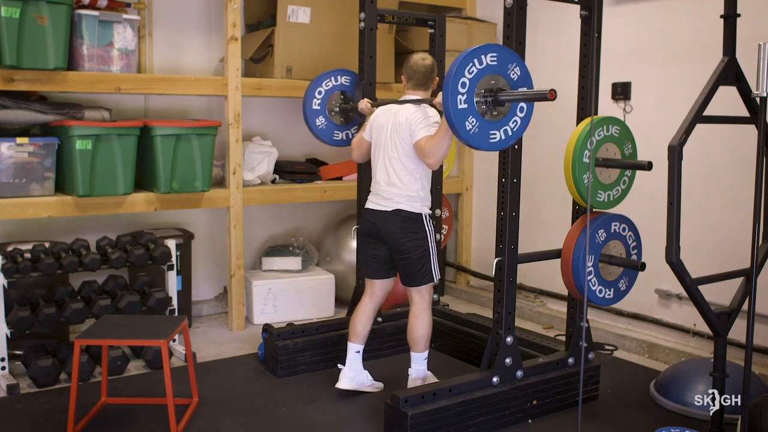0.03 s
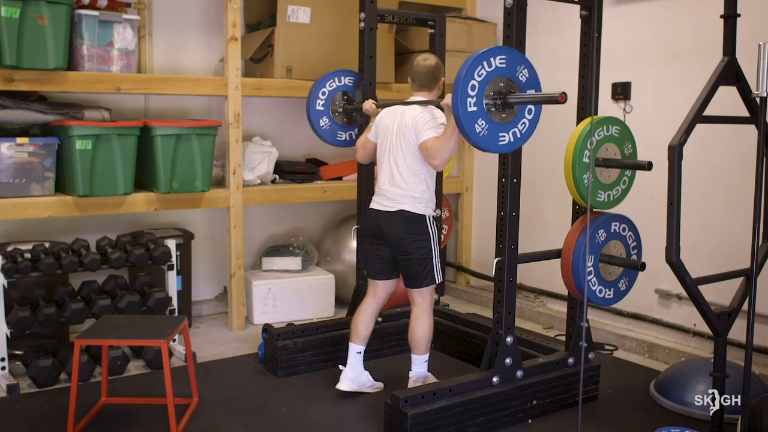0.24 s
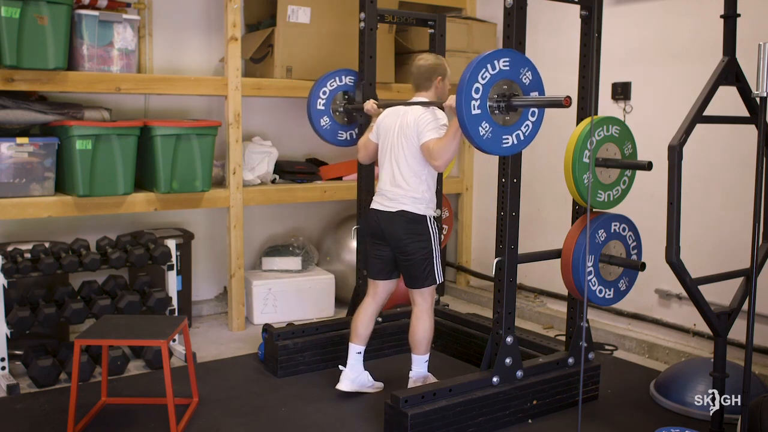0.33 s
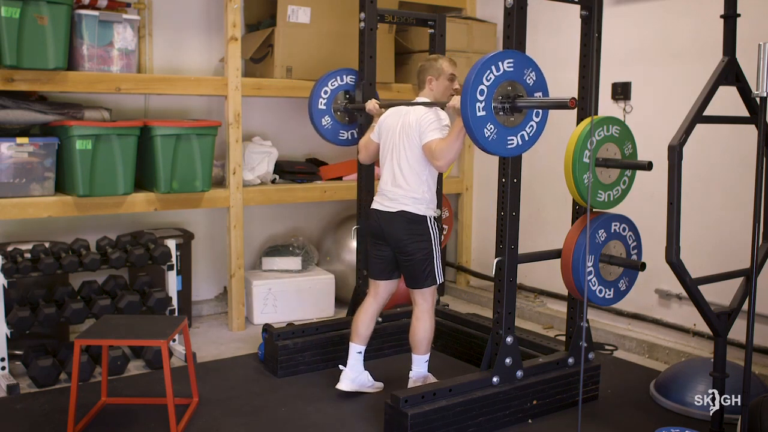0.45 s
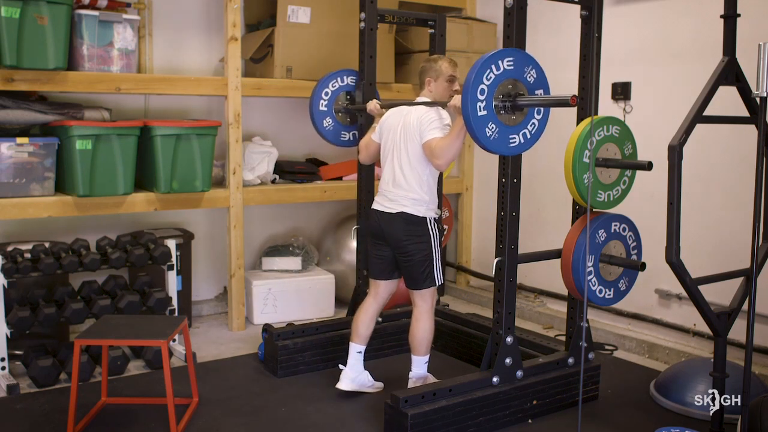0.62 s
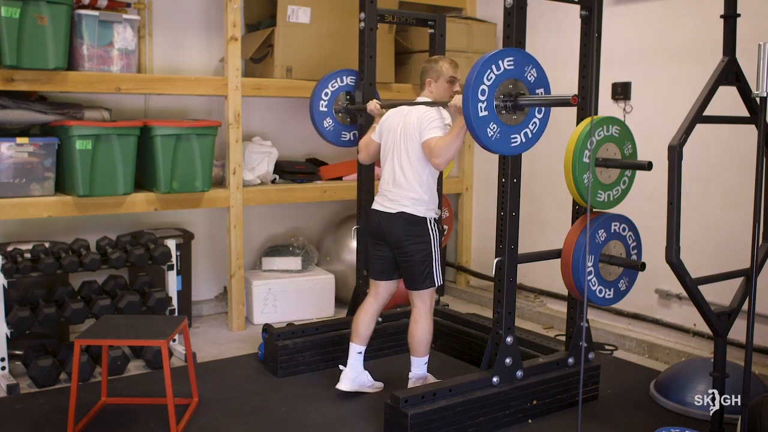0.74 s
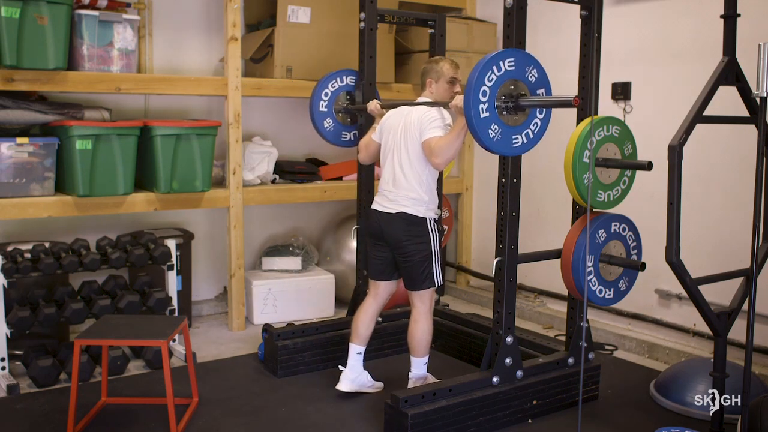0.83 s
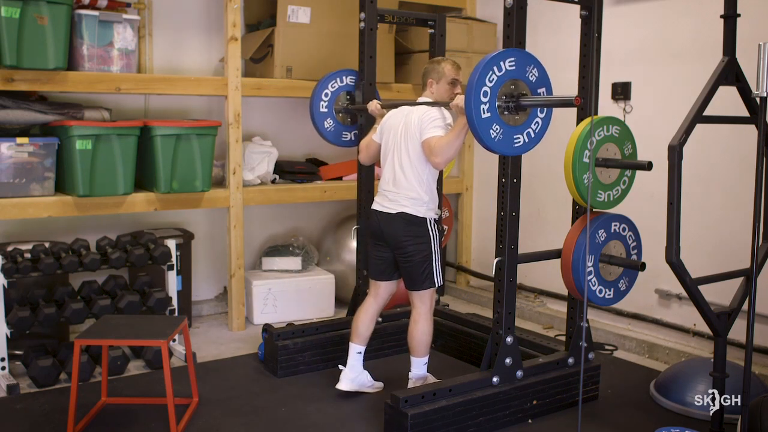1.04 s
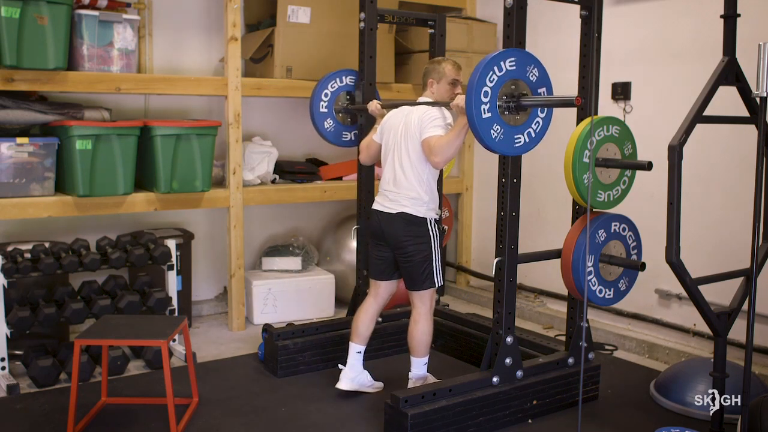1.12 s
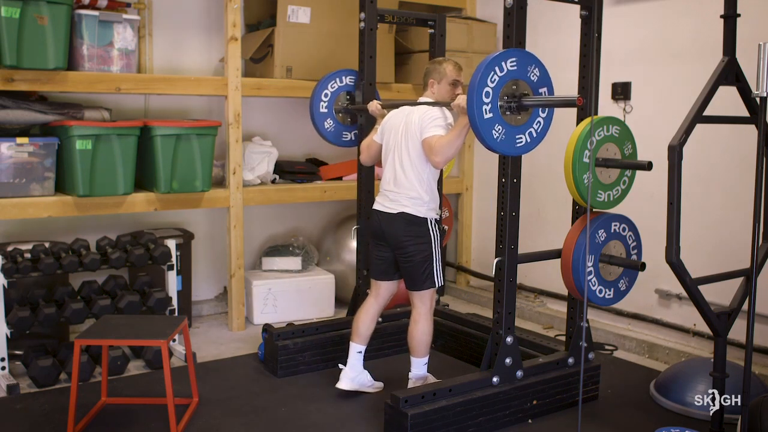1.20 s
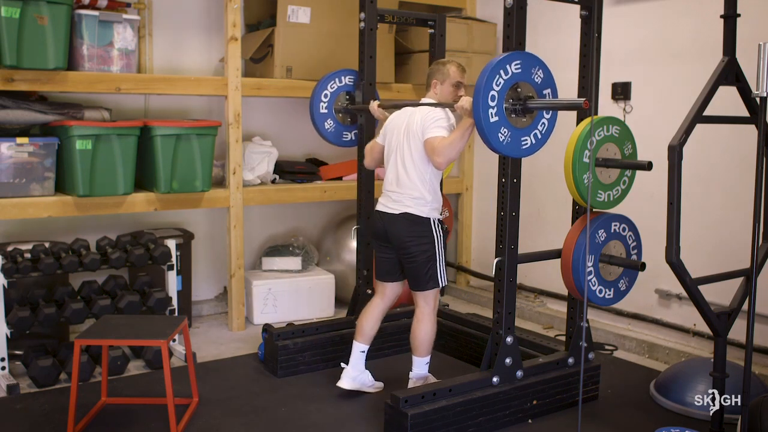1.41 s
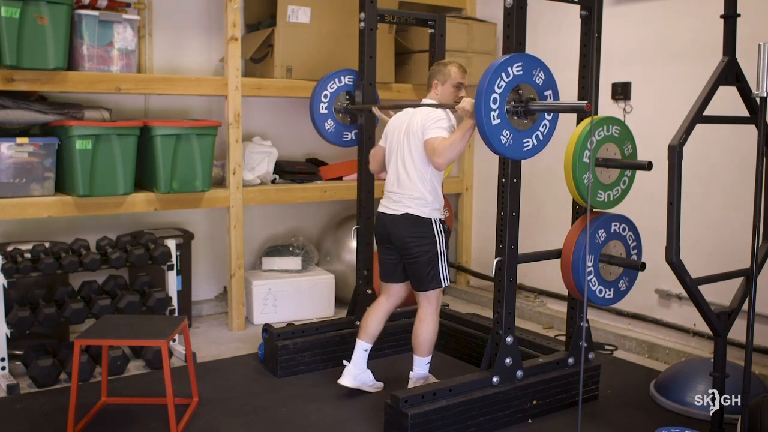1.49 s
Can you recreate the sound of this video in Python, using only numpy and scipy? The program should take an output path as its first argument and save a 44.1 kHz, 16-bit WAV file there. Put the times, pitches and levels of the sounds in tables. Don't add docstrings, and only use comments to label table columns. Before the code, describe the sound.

A loaded barbell is racked in a bare, echoing garage gym over faint hum and distant insects. At 0.2 s it scrapes with low floor thuds, then clanks onto steel hooks at 0.33 s. Knocks and sleeve clinks follow around 0.44-0.53 s, a harder landing at 0.67 s, rebounds near 0.75-0.9 s, and settling taps at 1.09-1.3 s. The frame rings; a shoe ticks stickily at 1.43 s.

```python
import sys
import numpy as np
from scipy import signal
from scipy.fft import rfft, irfft
from scipy.io import wavfile
from scipy.ndimage import uniform_filter1d

SR = 44100
rng = np.random.default_rng(int(sys.argv[2]) if len(sys.argv) > 2 else 0)


def wrap_up_sound(samples):
    columns = np.atleast_2d(samples).T
    tamed = np.clip(columns, -1, 1)
    steps = np.round(tamed * 32767).astype(np.int16)
    wavfile.write(sys.argv[1], SR, steps)


def voltage_ratio(level):
    return 10 ** (np.asarray(level, float) / 20)


N = 68355
TAIL = 36000
DIRECT_T60 = 0.011

# (frequency [Hz], level [dB])
FRAME_BODY = [(120, -61), (200, -21), (387, -13), (735, -0.5), (806, -1.5), (968, -5.5), (1480, -3.5),
              (3020, -2), (16000, -54)]
# (frequency [Hz], level [dB], t60 [s])
FRAME_MODES = [(1174, -7.5, 0.64), (1280, -12, 0.17), (1344, -5, 0.82), (1527, -6, 1.34), (1650, -15, .4),
               (1764, -2, 0.38), (1790, -7, 0.76), (2068, -2.5, 0.47), (2810, -4.5, 0.69),
               (2876, -7.5, 0.81), (5200, -18, .25)]


def unit(x):
    return x / np.sqrt(np.mean(x ** 2) + 1e-20)


def along(points, hz):
    f, v = np.transpose(points)
    return np.interp(np.log(hz + 1), np.log(f + 1), v)


def add(track, s, x):
    place = track[round(s * SR):][:len(x)]
    place += x[:len(place)]


def noise(gain):
    return unit(irfft(rfft(rng.standard_normal(N)) * gain(np.fft.rfftfreq(N, 1 / SR)), N))


def drift(count):
    changes_hz = 60
    knots = rng.standard_normal((2, count, 100))
    at = np.arange(TAIL) / SR * changes_hz
    return np.array([np.interp(at, np.arange(100), k) for k in knots[0] + 1j * knots[1]])


def clatter(body, peaks, tilt_db):
    # (frequency [Hz], t60 [s])
    room = [(100, 1), (400, 0.34), (1500, 0.51), (3500, 0.3), (7000, 0.23), (14000, 0.23)]
    direct_db, patchy_db = 0.5, 0.37
    late_db, late_longer = -21, 4.26
    hz, t, z = signal.stft(rng.standard_normal(TAIL), SR, nperseg=256)
    room_t60 = along(room, hz)[:, None]
    patches = uniform_filter1d(rng.standard_normal(z.shape), size=3, axis=0)
    patches = uniform_filter1d(patches, size=6, axis=1)
    fall = voltage_ratio(-60 * t / room_t60 + patchy_db * unit(patches))
    fall = fall + voltage_ratio(direct_db - 60 * t / DIRECT_T60)
    fall = fall + voltage_ratio(late_db - 60 * t / (late_longer * room_t60))
    tail = signal.istft(z * fall, SR, nperseg=256)[1][:TAIL]

    hz = np.fft.rfftfreq(SR, 1 / SR)
    bumps = sum(db * np.exp(-2 * ((hz - c) / w) ** 2) for c, w, db in peaks)
    tilt = tilt_db * np.log2((hz + 50) / 2000)
    colour = unit(voltage_ratio(along(body, hz) + bumps + tilt))
    return irfft(rfft(tail, SR) * colour, SR)[:TAIL]


def part(hits, body, peaks, modes, ring_db):
    spread_db = 2.26
    blur, steady_t60 = .7, .35
    out, t = np.zeros(N), np.arange(TAIL) / SR
    hz, level, t60 = np.transpose(modes)[:, :, None]
    swing = np.exp(2j * np.pi * hz * t) * voltage_ratio(level - 60 * t / np.clip(t60, .05, 2))
    swing = swing * (1 + voltage_ratio(-60 * t / DIRECT_T60))
    waver = blur * np.minimum(steady_t60 / t60, 1)
    fade_out = np.clip(5 * (t[-1] - t), 0, 1)
    for s, db, chatter, tilt_db in hits:
        luck = rng.standard_normal((2, len(modes), 1))
        struck = voltage_ratio(spread_db * luck[0] + tilt_db * np.log2(hz / 2000)) * np.exp(2j * luck[1])
        scattered = 1 + waver * drift(len(modes)) * np.tanh(20 * t)
        ring = (swing * struck * scattered).imag.sum(0)
        rise = (1 - np.exp(-3 * t / max(chatter, .001))) * fade_out
        add(out, s, voltage_ratio(db) * rise * (clatter(body, peaks, tilt_db) + voltage_ratio(ring_db) * ring))
    return out


def background():
    # (frequency [Hz], level [dB])
    room_tone = [(12, -43), (30, -1), (45, -20.5), (65, -28), (234, -34.5), (650, -34.5), (1400, -42),
                 (5380, -48), (8410, -36.5), (9140, -48.5), (16000, -44)]
    # (frequency [Hz], width [Hz], level [dB])
    bands = [
        (98, 38, -67.5),
        (192, 18, -74),
        (6300, 1100, -85),
        (8230, 480, -74.5),
        (8660, 145, -85),
    ]
    outside = sum(voltage_ratio(db) * noise(lambda f: np.exp(-2 * ((f - c) / w) ** 2)) for c, w, db in bands)
    return voltage_ratio(-60) * noise(lambda f: voltage_ratio(along(room_tone, f))) + outside


def liners():
    # (time [s], level [dB], chatter [s], brightness [dB/octave])
    hits = [
        (.198, -41, 0.0083, -2.5),
        (.22, -33, 0.02, -1.5),
        (.224, -47.5, 0.012, 6),
        (.2315, -35.5, 0.005, 3),
        (.245, -30.5, 0.0096, -2.5),
        (.265, -36, 0.0066, -3),
        (.3, -32.5, 0.028, -2.5),
        (.322, -36.5, 0.0048, 0),
    ]
    # (frequency [Hz], level [dB])
    body = [(150, -13.5), (250, -13.5), (372, -0.5), (1270, -10.5), (1990, -5.5), (3450, -4.5),
            (15500, -46)]
    # (frequency [Hz], width [Hz], level over the body [dB])
    peaks = [(1100, 92, 11), (3500, 290, 0.5), (6200, 450, -1.5)]
    return part(hits, body, peaks, FRAME_MODES, ring_db=-13.5)


def thuds():
    # (time [s], level [dB], pitch [Hz], t60 [s])
    blows = [(0.199, -27, 55, 0.13), (0.214, -29, 35, 0.24), (0.328, -37.5, 66, 1), (.43, -41, 62.5, 0.17),
             (0.532, -39.5, 47, 0.97), (0.67, -32.5, 61.5, 0.24), (.68, -37.5, 32, 0.35),
             (.76, -31, 30, 0.28), (0.871, -39.5, 72.4, 0.16), (1.0, -39.5, 61, .2),
             (1.089, -36.5, 71, 0.15), (1.426, -48, 100, 0.194)]
    rise_s, rumble_share = .003, .6
    out, t = np.zeros(N), np.arange(SR) / SR
    for s, db, hz, t60 in blows:
        rumble = noise(lambda f: 1 / (1 + (f / (3.2 * hz)) ** 4) * (f > 18))[:SR]
        envelope = voltage_ratio(db - 60 * t / t60) * (1 - np.exp(-t / rise_s))
        add(out, s, envelope * (rumble_share * rumble - np.sin(2 * np.pi * hz * t)))
    return out


def snaps():
    # (time [s], peak level [dB], pitch [Hz])
    clicks = [(0.2357, -36, 2480), (0.244, -22.5, 1500), (0.2646, -21, 2430), (.333, -13, 3500),
              (.340, -9, 2980), (0.348, -11, 2480), (.350, -27, 3500), (.361, -11.5, 2900),
              (.4388, -19, 5140), (.449, -22, 1500), (.529, -11, 4400), (.535, -14, 3700),
              (0.679, -12, 3500), (.710, -18, 2500), (0.758, -9.5, 1970), (.773, -13, 2540),
              (.874, -17.5, 1470), (0.888, -19, 1520), (1.0941, -36, 4400), (1.223, -19.5, 1690),
              (1.2254, -25, 2000), (1.244, -22, 1720), (1.284, -23, 1500)]
    cycles = 8.8
    out, t = np.zeros(N), np.arange(400) / SR
    for s, db, hz in clicks:
        envelope = voltage_ratio(db + 7 - 60 * t * hz / cycles) * np.tanh(t * hz) ** 2
        add(out, s, -envelope * np.sin(2 * np.pi * hz * t))
    return out


def hooks():
    # (time [s], level [dB], chatter [s], brightness [dB/octave])
    hits = [
        (.3305, -24, 0.014, -2),
        (.668, -21.5, 0.003, 1.5),
        (.6725, -18, 0.002, 2.5),
        (.69, -23.5, 0.004, 6),
        (.706, -31, 0.0043, -5),
        (.765, -30.5, 0.0017, 0),
    ]
    # (frequency [Hz], level [dB])
    body = [(120, -51), (200, -25), (558, -8.5), (933, -12.5), (1320, -1.5), (2470, -5.5), (3490, -6.5),
            (7010, -23), (16000, -47.5)]
    # (frequency [Hz], width [Hz], level over the body [dB])
    peaks = [(3620, 470, 7), (6780, 930, 10.5), (10040, 940, 7.5), (13500, 500, 5)]
    # (frequency [Hz], level [dB], t60 [s])
    modes = [(566.5, 2.5, 0.16), (672, -2, 0.14), (1099, 2.5, 0.12), (1320, -6.5, 0.84), (1653, -7.5, .5),
             (1895, -8, .25), (2237, -2.5, 0.34), (3391, -7.5, 0.45), (3410, -1.5, 0.17), (3493, 1, 0.27),
             (3546, -8, 0.25), (4120, -8.5, .3), (4235, -8, 0.27), (6605, -25, 0.35), (6910, -19.5, 0.44)]
    return part(hits, body, peaks, modes, ring_db=-6.5)


def plates():
    # (time [s], level [dB], chatter [s], brightness [dB/octave])
    hits = [(.345, -28.5, 0.075, 4), (.46, -37.5, 0.011, -3.5), (.535, -32.5, 0.0036, 0),
            (.58, -50.5, 0.0098, -4), (.672, -27.5, 0.029, -2), (.77, -37.5, 0.0086, -4.5),
            (.9, -35.5, 0.041, -3), (1.0, -47, 0.023, -5.5), (1.093, -40, 0.0021, 2),
            (1.108, -43.5, 0.0072, -4), (1.127, -48, 0.0041, -4), (1.22, -37, 0.0046, 2.5),
            (1.27, -61, 0.036, -3)]
    # (frequency [Hz], level [dB])
    body = [(100, -7.5), (170, -7), (260, -13.5), (320, 1.5), (600, -3), (1000, -8), (2000, -53)]
    # (frequency [Hz], width [Hz], level over the body [dB])
    peaks = [(411, 15, 8), (545, 30, 6.5), (803, 254, 8)]
    # (frequency [Hz], level [dB], t60 [s])
    modes = [(350, -2, .2), (378, 0, .3), (435, -6, .2), (562, -8, .22), (630, -10, .2), (690, -9, .2)]
    return part(hits, body, peaks, modes, ring_db=-3)


def frame():
    # (time [s], level [dB], chatter [s], brightness [dB/octave])
    hits = [
        (.437, -25.5, 0.012, 1.5),
        (.47, -32.5, 0.046, -6.5),
        (.749, -25.5, 0.009, 0.5),
        (.843, -33, 0.013, -9),
        (.95, -38, 0.0031, -10),
    ]
    # (frequency [Hz], width [Hz], level over the body [dB])
    peaks = [(1290, 400, 6), (2660, 210, -4), (5220, 134, 9.5)]
    return part(hits, FRAME_BODY, peaks, FRAME_MODES, ring_db=-7)


def sleeves():
    # (time [s], level [dB], chatter [s], brightness [dB/octave])
    hits = [
        (.5245, -31.5, 0.0045, 0),
        (.533, -35, 0.0014, 2.5),
        (1.092, -43, 0.0012, -5),
    ]
    # (frequency [Hz], level [dB])
    body = [(1180, -37), (2000, -10), (4230, -13), (4610, -6), (5350, -18), (7060, -23), (16000, -42)]
    # (frequency [Hz], width [Hz], level over the body [dB])
    peaks = [(3570, 850, 9.5), (4320, 420, 8), (6890, 610, 12.5)]
    # (frequency [Hz], level [dB], t60 [s])
    modes = [(3510, -12, .2), (3677, -2, 0.062), (3730, 2, 0.073), (4290, -16, 0.085), (4504, 1, 0.12),
             (4830, -4, 0.049), (6923, -18, 0.34), (7100, -23, 0.15)]
    return part(hits, body, peaks, modes, ring_db=1)


def rebound():
    # (time [s], level [dB], chatter [s], brightness [dB/octave])
    hits = [
        (.868, -34.5, 0.0018, -2.5),
        (.8725, -29.5, 0.0018, -1),
        (.888, -39, 0.0036, -4),
    ]
    # (frequency [Hz], width [Hz], level over the body [dB])
    peaks = [(1410, 370, 5), (2720, 160, 7.5)]
    # (frequency [Hz], level [dB], t60 [s])
    modes = [(1156, -4, 0.21), (1283, -8, 0.22), (1313, 4.5, 0.17), (1513, -3.5, 1), (1600, 1, 0.21),
             (2818, -3.5, 0.34), (2940, -6, 0.7)]
    return part(hits, FRAME_BODY, peaks, modes, ring_db=-4.5)


def settle():
    # (time [s], level [dB], chatter [s], brightness [dB/octave])
    hits = [
        (1.219, -28.5, 0.0064, 1),
        (1.241, -35.5, 0.0033, -4),
        (1.26, -40.5, 0.0048, -4),
        (1.282, -41.5, 0.0014, -7.5),
        (1.3, -53, 0.011, -9),
    ]
    # (frequency [Hz], width [Hz], level over the body [dB])
    peaks = [(375, 59, 14), (1410, 690, 5.5), (6030, 270, 7.5)]
    # (frequency [Hz], level [dB], t60 [s])
    modes = [(795, -16, 0.7), (804, -7, 0.42), (1171, -5.5, 0.31), (1244, -17, 1.5), (1407, -4.5, 0.16),
             (1524, -11, 1.34), (1638, 0, 0.22), (1723, 0.5, 0.28), (2557, -6.5, 0.51), (2980, -12, 0.4)]
    return part(hits, FRAME_BODY, peaks, modes, ring_db=-0.5)


def shoe():
    # (time [s], peak level [dB], top frequency [Hz])
    ticks = [
        (1.4302, -27, 6900),
        (1.4335, -36, 17000),
        (1.4395, -29.5, 6200),
        (1.411, -42, 12000),
    ]
    tick_t60, scuff_db, scuff_t60 = .0015, -63, 1.2
    out, t = np.zeros(N), np.arange(SR // 2) / SR
    hz = np.fft.rfftfreq(len(t), 1 / SR)
    for s, db, top_hz in ticks:
        tick = voltage_ratio(db - 60 * t / tick_t60) * (.5 * rng.standard_normal(len(t)) - 1)
        add(out, s, irfft(rfft(tick) / (1 + 1j * hz / top_hz) ** 2))
    scuff = voltage_ratio(scuff_db - 60 * t / scuff_t60) * rng.standard_normal(len(t))
    add(out, ticks[1][0], scuff)
    return out


def scene():
    approach = background() + liners() + thuds() + snaps()
    racking = hooks() + plates() + frame() + sleeves()
    ending = rebound() + settle() + shoe()
    return (approach + racking + ending)[None]


def roll_off(x):
    return signal.sosfilt(signal.butter(12, 16460, fs=SR, output="sos"), x)


def record(dry):
    mic_hz, top_hz = 15200, 15900
    hz = np.fft.rfftfreq(N, 1 / SR)
    response = (hz < top_hz) / (1 + (hz / mic_hz) ** 8)
    mix = irfft(rfft(dry) * response, N)
    return roll_off(mix)


dry = scene()
out = record(dry)
wrap_up_sound(out)
```